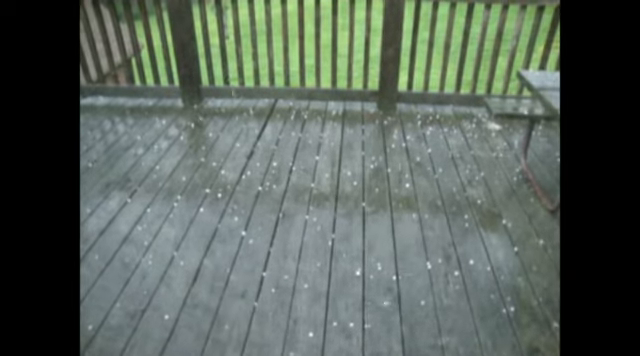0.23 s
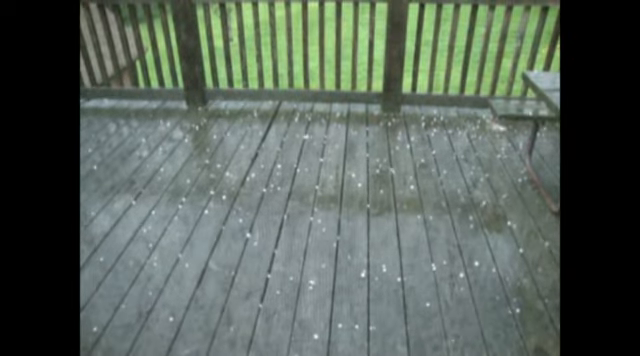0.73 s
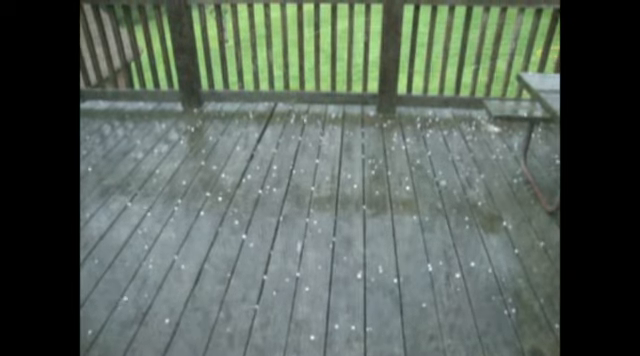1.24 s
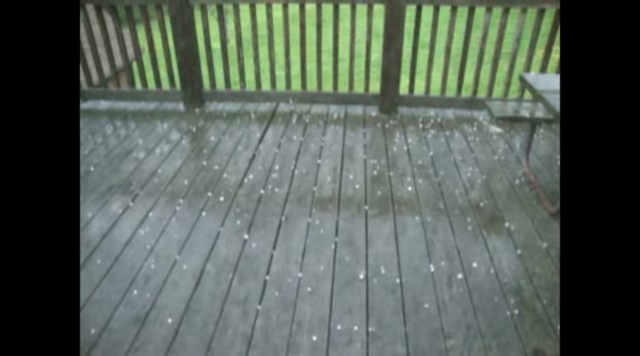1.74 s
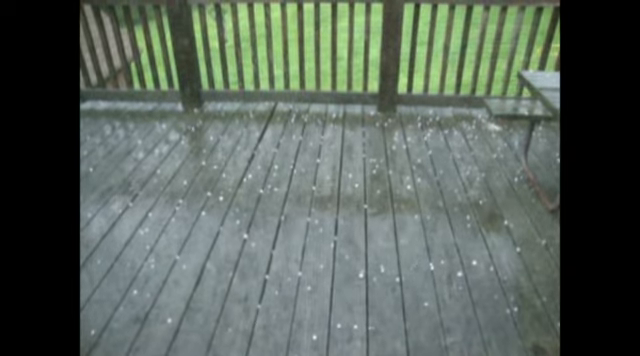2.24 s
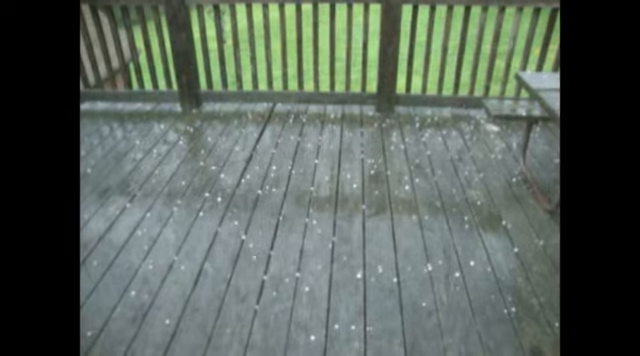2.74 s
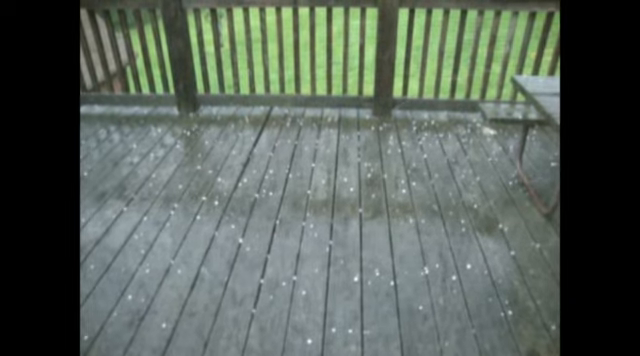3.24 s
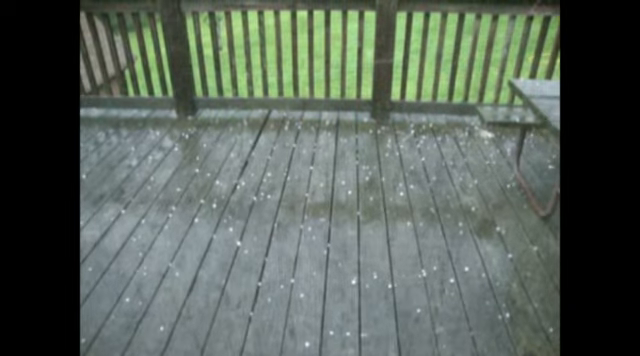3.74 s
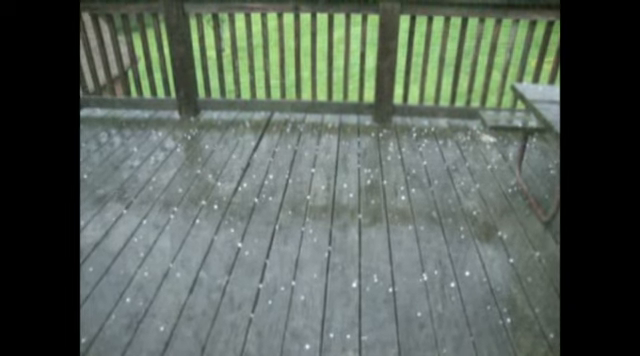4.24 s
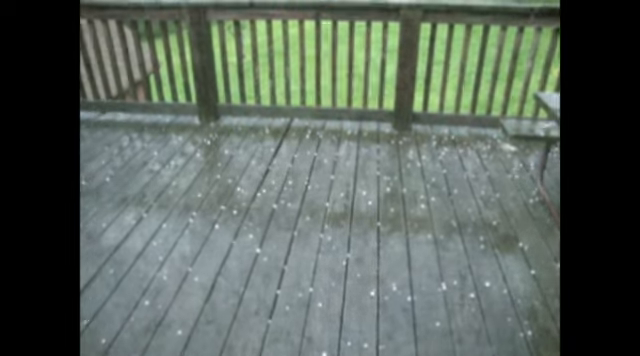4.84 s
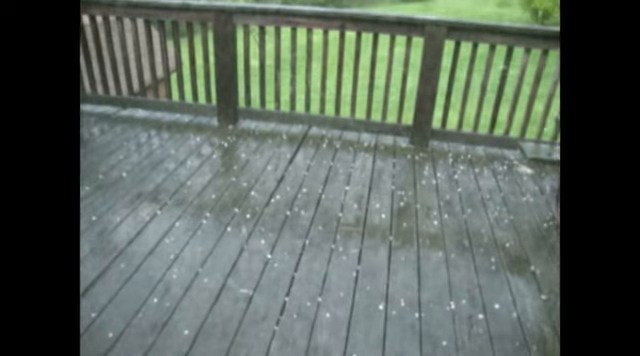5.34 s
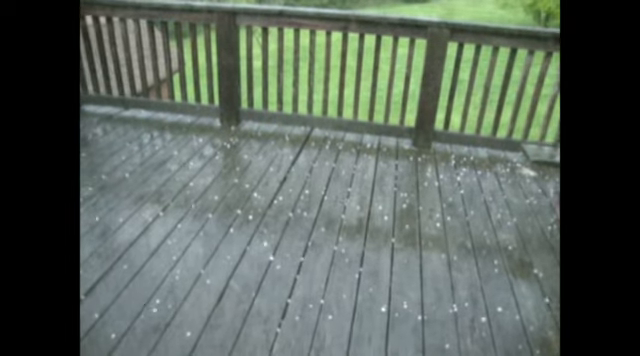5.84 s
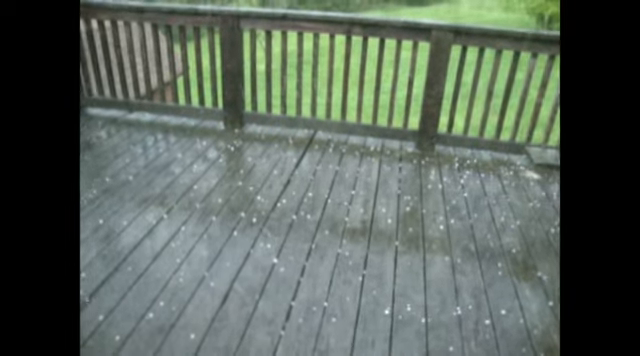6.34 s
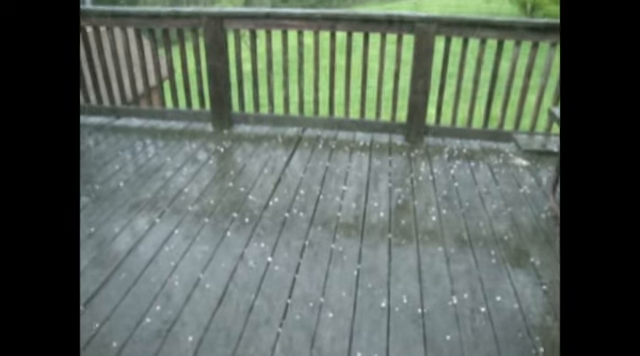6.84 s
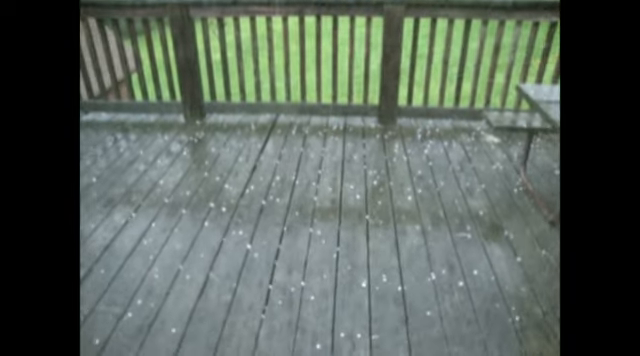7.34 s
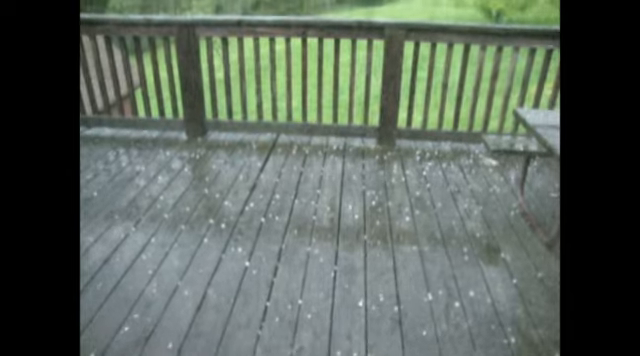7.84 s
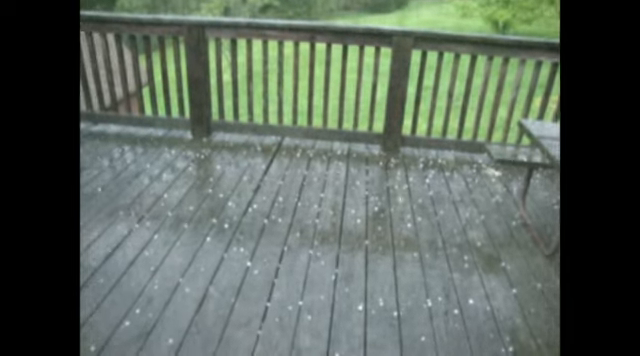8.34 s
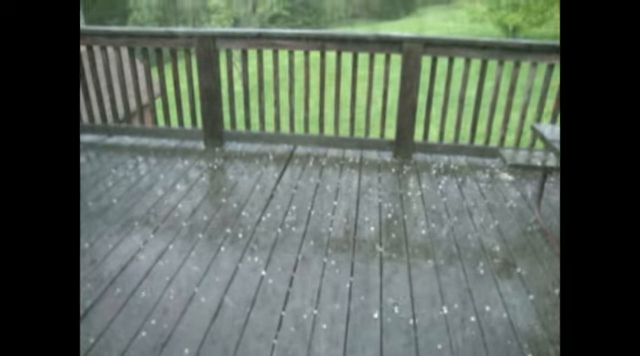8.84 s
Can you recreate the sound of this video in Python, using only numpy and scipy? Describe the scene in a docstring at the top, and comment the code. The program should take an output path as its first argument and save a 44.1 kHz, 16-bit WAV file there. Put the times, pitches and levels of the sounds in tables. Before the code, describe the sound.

Hail rattles onto outdoor deck boards: crisp irregular clicks, small clacks and occasional faint metallic pings above continuous light rain noise.

```python
"""A wooden deck beside a house wall, under a patter of small hail and rain.
Each near stone is an impact: a hard tick, then filtered noise decaying as boards, rails and wall reply.
Decaying sines ring struck spots and metal; low sines make thuds, and clustered modes make hard knocks.
Many random small ticks, clicks and plinks over a dull noise wash fill the gaps, following one shower level.
"""
import sys
import numpy as np
from scipy import signal
from scipy.fft import rfft, irfft
from scipy.io import wavfile

SR = 44100
rng = np.random.default_rng(int(sys.argv[2]) if len(sys.argv) > 2 else 0)


def master(y):
    """Save y as 16-bit WAV."""
    cut = np.clip(np.atleast_2d(y).T, -1, 1)
    pcm = np.round(cut * 32767)  # scale
    wavfile.write(sys.argv[1], SR, pcm.astype(np.int16))


N = 400869  # length of the scene in samples
HIT = 8192  # usual length of one impact in samples

# colour of ice on wet boards, as relative density: frequency_hz, level_db (per Hz)
DECK_COLOUR = [(24, -49), (40, -43), (124, -32), (583, -4), (1310, -1.5), (2330, 0), (4670, 2.5),
               (8710, -4), (10000, -9.5), (13000, -63), (22000, -120)]


def undb(db):
    """Level to amplitude: 20 dB is a factor of ten."""
    return 10 ** (np.asarray(db) / 20)


def unit(x):
    """Normalisation: scale the last axis to rms 1."""
    return x / np.sqrt(np.mean(x ** 2, axis=-1, keepdims=True) + 1e-20)


def fade(t60, size=HIT):
    """Exponential decay: the level falls 60 dB in t60 seconds."""
    return np.exp(-np.log(1000) * np.arange(size) / SR / t60)


def colour(points, size):
    """Spectral envelope: gain per bin, linear in dB over log frequency, from (Hz, dB) points."""
    hz, db = np.transpose(points)
    bin_hz = np.fft.rfftfreq(size, 1 / SR) + 1
    return undb(np.interp(np.log(bin_hz), np.log(hz), db))


def shape(x, gain):
    """Linear filtering: multiply the spectrum of the last axis by a gain per bin."""
    return irfft(rfft(x) * gain, x.shape[-1])


def causal(gain):
    """Minimum phase: fold the cepstrum so that a response of this gain rings only after the blow."""
    cepstrum = irfft(np.log(gain + 1e-5))
    half = cepstrum.shape[-1] // 2
    cepstrum[..., 1:half] *= 2
    cepstrum[..., half + 1:] = 0
    return np.exp(rfft(cepstrum))


def add(out, s, sound):
    """Superposition: mix a sound in at time s (seconds)."""
    i = int(np.clip(s * SR, 0, N - 1))
    out[i:i + len(sound)] += sound[:N - i]


def spots(count, spread_db, size=HIT, order=30):
    """Local resonance: every spot on the boards has its own broad, random peaks and dips."""
    hz = np.geomspace(200, 11000, order)
    chance = rng.standard_normal((count, order))
    return np.array([colour(np.c_[hz, spread_db * row], size) for row in chance])


def echoes(count, grain_db, size=HIT):
    """Dense reflections: Gaussian noise whose strength varies by chance from grain to grain."""
    chance = rng.standard_normal((count, 2, size))
    strength = np.repeat(chance[:, 1, ::16], 16, axis=1)  # one strength per 16 samples
    return unit(chance[:, 0] * undb(grain_db * strength))


def air(db=-72, low_hz=45, high_hz=330):
    """Stationary band-limited noise: a faint, even outdoor rumble under everything."""
    hz = np.fft.rfftfreq(N, 1 / SR)
    band = hz / (hz + low_hz) / (1 + (hz / high_hz) ** 4)
    return undb(db) * unit(shape(rng.standard_normal(N), band * np.sqrt(hz)))


def far_wash(flicker_db=4.0, count=400, rumble_hz=260):
    """Incoherent summation: hail on roof and lawn merges into dull noise, each octave flickering alone."""
    # colour of the shower further off, as relative density: frequency_hz, level_db (per Hz)
    far_colour = [(18, -62), (30, -55.5), (173, -7.5), (657, 7), (1120, 9), (4480, 3.5), (8640, -22),
                  (10000, -17), (13000, -33), (22000, -120)]
    # low end of the wash, strongest in the lowest octaves: time_s, level_db
    rumble_curve = [(0, -3), (1, -13), (2, -4), (3, -8), (4.001, -2), (4.401, 9), (5.5, 3), (6.4, 5.5),
                    (6.9, -4), (7.6, 3), (9, 6.5)]
    out = 0
    hz = np.fft.rfftfreq(N, 1 / SR) + 1
    rumble_db = np.interp(np.arange(N) / SR, *np.transpose(rumble_curve))
    for centre in 2. ** np.arange(5, 14):
        # overlapping bands whose powers add up evenly
        octave = np.sqrt(np.clip(1 - np.abs(np.log2(hz / centre)), 0, 1))
        flicker = np.interp(np.arange(N), np.linspace(0, N, count), rng.standard_normal(count))
        db = flicker_db * flicker + rumble_db / (1 + (centre / rumble_hz) ** 2)
        noise = shape(rng.standard_normal(N), octave * colour(far_colour, N))
        out = out + noise * undb(db)
    return unit(out)


def small_stones(count=1150, size=4096, spread_db=1.0, tick_t60=0.03, tail_t60=0.035, tail_db=-14):
    """Random impacts: lesser stones and drops over the deck, each a decaying noise tick with a short tail."""
    when, strength = rng.random((count, 2)).T
    envelope = fade(tick_t60, size) + undb(tail_db) * fade(tail_t60, size)
    gain = spots(count, spread_db=5.0, size=size, order=44) * colour(DECK_COLOUR, size)
    sounds = unit(shape(rng.standard_normal((count, size)) * envelope, causal(gain)))
    levels_db = -spread_db * np.log(0.73 + strength)
    out = np.zeros(N)
    for s, db, sound in zip(when * N / SR, levels_db, sounds):
        add(out, s, undb(db) * sound)
    return unit(out)


def drips(count=120, low_hz=2500, high_hz=8500, t60=0.017, glide=0.5, spread_db=7):
    """Damped oscillation: drops and bouncing ice give tiny plinks, sines that glide up very slightly."""
    out, t = np.zeros(N), np.arange(HIT) / SR
    for when, pitch, strength in rng.random((count, 3)):
        hz = low_hz * (high_hz / low_hz) ** pitch
        plink = np.sin(2 * np.pi * hz * t * (1 + glide * t)) * fade(t60)
        add(out, when * N / SR, undb(spread_db * strength) * plink)
    return unit(out)


def chips(count=190, size=1024, t60=0.0085, spread_db=5):
    """Brief broadband impacts: chips of ice bounce close by as dry clicks, most faint and a few sharp."""
    when, luck = rng.random((count, 2)).T
    gain = spots(count, spread_db=1.5, size=size) * colour(DECK_COLOUR, size)
    clicks = shape(rng.standard_normal((count, size)) * fade(t60, size), causal(gain))
    clicks /= np.abs(clicks).max(axis=1, keepdims=True)
    levels_db = -spread_db * np.log(0.062 + luck)
    out = np.zeros(N)
    for s, db, click in zip(when * N / SR, levels_db, clicks):
        add(out, s, undb(db) * click)
    return out


def rebounds(count, latest_s=.008, db=-8, order=3):
    """Early reflection: response of a tick and a few weaker ones, from shards and the nearest surfaces."""
    lag, strength = rng.random((count, 2, order, 1)).transpose(1, 0, 2, 3)
    hz = np.fft.rfftfreq(HIT, 1 / SR)
    delayed = np.exp(-2j * np.pi * hz * lag * latest_s)
    return 1 + np.sum(undb(db) * strength * delayed, axis=1)


def strikes(knock_top_hz=1500, splash_from_hz=5000,
            knock_t60=0.35, clatter_t60=0.27, splash_t60=0.13, tick_t60=0.017,
            tick_db=-5.0, knock_db=-2.5, clatter_db=-1.28, splash_db=-3.0,
            ring_lift_db=2, ring_octaves=0.11, tick_octaves=1.0,
            swell_s=0.003, grain_db=3, contact=4):
    """Impact and frequency-dependent damping: a direct tick, then boards and walls reply, treble dying first."""
    # hailstones that stand out, levels before the trims above:
    # start_s, tick_peak_db, wood_knock_db, clatter_db, icy_splash_db, spot_pitch_hz, spot_resonance_db
    stone_table = [(0.005, 0, -48, -20.5, -19, 6150, -2.5), (0.05, -10, -58, -28, -24, 6940, 3.0),
                   (0.104, -10, -27.5, -27, -47, 2060, 8), (0.151, -6, -31, -26, -19, 7100, 3),
                   (0.234, -28, -27, -18.5, -20.5, 3790.0, -4), (0.302, -10, -35, -19.5, -24, 5990.0, 5),
                   (0.314, -7, -29.5, -20.5, -30, 1930, -4), (0.358, -6, -27, -20.5, -25, 1960, 0),
                   (0.392, -13, -28, -20.5, -23, 1890, 3), (0.432, -6, -33, -22.5, -27, 3270.0, -1),
                   (0.477, -7, -29, -23, -33, 2840.0, 1), (0.603, -16.5, -28, -25, -18, 600.0, 1),
                   (0.6105, -10, -38, -20, -23, 3800, -1), (0.696, -22, -34, -36, -26, 1240, 4.5),
                   (0.704, -3.5, -35, -26, -32, 2800, -1), (0.782, -22, -30.5, -32, -35.0, 2800.0, 5),
                   (0.802, -6, -32, -27, -32, 3740, 1.5), (0.881, -5, -33, -25, -28, 4230, 5),
                   (0.916, -5.5, -38, -31, -28, 4180, 6), (1.015, -14, -31.5, -25, -33, 600.0, 3),
                   (1.044, -4, -40, -22, -39, 6550.0, 3.0), (1.063, -14, -55.0, -28, -23, 8400, 9),
                   (1.157, -6, -36, -29, -35, 4610.0, 3), (1.196, -3.5, -31.5, -22, -14, 5200, 2),
                   (1.234, -4, -33, -20.5, -14, 6100, -1), (1.266, -7.5, -29.5, -22, -18, 4900, 2),
                   (1.37, -11.5, -39, -30, -43, 5000, 4), (1.423, -10, -28.5, -25.5, -24, 2770, 4),
                   (1.473, -22, -37, -22, -28, 3140.0, 1), (1.496, -7, -45, -27, -31, 2600, 2.5),
                   (1.52, -5, -34.5, -24.5, -24, 5940.0, 3), (1.608, -10, -33, -23.5, -21.5, 5250.0, 1),
                   (1.751, -21, -33.5, -28.5, -26.5, 8180.0, 3), (1.864, -1, -29, -22, -19.5, 2300, 3),
                   (1.921, -17, -38, -33, -21, 7240.0, -3), (1.962, -12, -31, -31, -25, 2800.0, 7),
                   (1.994, -14, -35, -26, -24, 5170.0, 6.5), (2.013, -11, -36, -30, -32, 3000, 6),
                   (2.022, -5.5, -28, -24.5, -26, 1240, 1), (2.107, -14, -33, -28, -23.5, 3320.0, 8),
                   (2.186, -9.5, -29.5, -30.5, -23, 2630.0, 5), (2.22, -10, -29.5, -25, -29, 5530, 1),
                   (2.312, -21, -48, -28, -36, 5990.0, 2), (2.351, -7, -26.5, -26.5, -24, 3750.0, 4),
                   (2.463, -19, -25, -23, -23.5, 1380.0, 2), (2.513, -10, -31, -27, -18, 3140.0, 9),
                   (2.56, -7, -29, -23, -23, 2580.0, 0), (2.571, -6, -27, -22, -28, 2670.0, -5),
                   (2.585, -11.0, -35, -24, -31, 3750.0, -7), (2.591, -4.5, -34, -30, -20, 3420, 10),
                   (2.756, -10, -35.5, -30.5, -47, 5900.0, 4), (2.855, -9, -29, -23.5, -29, 1210.0, 2),
                   (2.881, -14, -29, -25, -18, 6100, 4), (2.986, -12, -43, -26, -26, 4780.0, -3),
                   (2.995, -10, -43, -30, -26, 3100, -2), (3.037, -1, -30, -23, -24, 3080, 1.5),
                   (3.077, -6, -29, -26, -23.5, 600.0, 2.5), (3.099, -7, -54.5, -33, -32, 2040, 6),
                   (3.15, -4.5, -58, -21, -16, 5900, -2.5), (3.246, -4.5, -38, -32, -43, 4010.0, 2),
                   (3.288, -10, -53.5, -26, -46, 3800, 6), (3.302, -13, -55, -28, -19, 5770.0, -2),
                   (3.348, -19, -48, -23, -18, 4300, 3), (3.416, -16, -30, -23, -34, 4220.0, 1),
                   (3.456, -8, -49, -32, -34, 4610.0, -4), (3.483, -7, -33, -33, -26, 2070.0, 2),
                   (3.491, -5, -48, -32, -27, 1970, 4.5), (3.571, -18, -38, -26, -41, 3750.0, -2),
                   (3.63, -11, -34, -25, -52, 5940.0, 4), (3.653, -12, -27, -30, -15, 7600, -2),
                   (3.717, -11.5, -34, -31, -22, 4440.0, 3), (3.764, -10, -35, -26.5, -25, 2150.0, -1),
                   (3.832, -5, -31.5, -26.5, -23, 5800, 3), (3.872, -11, -28.5, -21.5, -22, 5340.0, -4),
                   (3.899, -3, -42, -28, -32, 2330.0, 0.5), (3.941, -10, -31, -26.5, -19, 8100.0, 1),
                   (3.96, -17, -33, -23.5, -32, 3960.0, 2), (3.991, -6, -29, -26.5, -20, 8600, 4),
                   (4.03, -12, -47, -33, -30, 7670.0, 0), (4.059, -12, -28.5, -28, -18, 6720.0, -4),
                   (4.072, -11, -50, -27, -41, 1420, 10), (4.12, -13, -34, -33.5, -34.5, 3790.0, 3),
                   (4.166, -7, -50, -20, -33, 5950, 4), (4.228, -20, -31, -26.0, -33, 3060.0, 1),
                   (4.285, -9, -51, -24.5, -23, 4760, 5.5), (4.307, -13, -36, -29.5, -36, 2180, 6),
                   (4.411, -2.5, -45, -29, -21.5, 8050, 0.5), (4.457, -23.5, -48, -37, -24, 3250, 8),
                   (4.517, -9, -29, -22.5, -28, 4900, 3.5), (4.636, -18.0, -52, -39, -25.5, 7620.0, -1),
                   (4.654, -8, -34, -28, -41, 735, 3.5), (4.668, -7.5, -50, -26, -48, 4440.0, 1),
                   (4.699, -8, -41, -22.5, -24, 3500, 6), (4.78, -26.0, -28, -30, -25, 2370.0, 6),
                   (4.845, -2, -31.5, -27, -48, 2800, 5.5), (4.878, -26, -35, -26, -16.5, 6330.0, -4),
                   (4.892, -10, -26.5, -36, -32, 950.0, -1.5), (4.911, -9, -34, -24, -21, 3830.0, 3),
                   (5.0705, -5.5, -39, -27, -22.5, 2450, 5), (5.125, -12.5, -37, -27, -26.5, 786, 9),
                   (5.172, -22, -39, -26, -26, 1030.0, 2), (5.186, -5.5, -31.5, -34, -18.5, 7540.0, 0),
                   (5.247, -9.5, -33, -30, -33.0, 5940.0, 0), (5.307, -11, -40, -32, -46, 1340.0, 2.5),
                   (5.337, -12, -36, -21.5, -21, 2690, 4), (5.354, -8.5, -25.5, -45, -25, 960, -1),
                   (5.42, -6.5, -35, -26.0, -22.5, 5210.0, 0), (5.492, -18.5, -40, -22.5, -26, 1090, 13.5),
                   (5.55, -3, -27.5, -26, -27.5, 2600, 2), (5.564, -10, -37, -27, -31, 1130, 9),
                   (5.608, -10, -34, -33, -36, 2580.0, -3), (5.693, -4, -30, -17, -21, 4770, 0.5),
                   (5.764, -14.0, -40, -30, -24.5, 8050, 3.5), (5.891, -21, -34.5, -28.5, -27, 7700, -1),
                   (5.932, -13, -56, -50, -25, 5900.0, 2), (6.051, -13, -30.5, -38, -28, 2800.0, 8),
                   (6.079, -14, -37, -30, -36, 4840, 2), (6.164, -17, -24.5, -26, -36, 1840, 7),
                   (6.18, -12, -37, -22, -37, 2410.0, 6), (6.235, 2, -37, -18.5, -23, 4900, 2),
                   (6.26, -10, -30, -21, -16, 5730.0, 3), (6.307, -11, -28, -26, -32, 1770.0, -6),
                   (6.336, -5, -43, -31, -48, 1550.0, 2), (6.371, -12, -37, -21, -48, 4000, 5),
                   (6.386, -2.5, -43, -39, -35, 4050.0, 0), (6.41, -6.5, -31, -22, -26, 3620.0, -1),
                   (6.432, -11, -23.5, -21.5, -19, 5680.0, 2), (6.497, -2, -34.5, -33, -24, 7800.0, 0.5),
                   (6.526, -4.5, -56, -28, -24, 4730, 3), (6.544, -3, -42, -32, -23.5, 8100, 1),
                   (6.603, -30, -41, -26, -18, 5940, 7), (6.622, -8, -29, -21.5, -34, 2490, -4),
                   (6.698, -11, -30, -26.5, -20, 1040, 3), (6.813, -29, -55.0, -28, -21, 7920.0, -4),
                   (6.928, -4, -30, -21.5, -30, 4300, 0), (6.959, -6, -35.5, -22.5, -22, 4700, -1),
                   (7.078, -25, -27.5, -24, -27, 1080, 9), (7.139, -7, -30.5, -29, -24, 6680.0, 1),
                   (7.171, -3.5, -49, -26, -25, 4780.0, 1.5), (7.204, -12, -36, -31, -29, 1210.0, 7),
                   (7.237, -6, -33, -23, -22, 4200, 3), (7.28, -10, -36, -35, -22, 7450.0, 0),
                   (7.301, -7, -25, -27, -26.0, 7410.0, 3), (7.391, -13, -36, -26, -25, 3700, 7),
                   (7.445, -8.5, -30, -41, -37, 4050.0, 7.5), (7.55, -9, -32, -24, -40, 5040.0, -2.5),
                   (7.605, -13, -28, -27.5, -23, 6760.0, 1), (7.65, -18, -41, -29, -30, 3190.0, -2),
                   (7.682, -17, -41, -39, -28, 4010.0, 1.5), (7.704, -12, -44, -33, -31, 4010.0, 5),
                   (7.721, -10, -32, -31, -28, 3750.0, 5), (7.752, -13.0, -30, -19, -46, 1870, 3),
                   (7.804, -2.5, -40, -29, -36, 3490.0, 1), (7.823, -6.5, -46, -29, -22, 5680.0, -4),
                   (7.95, -13, -34, -31, -32, 1290.0, 7), (7.98, -10, -45, -25, -40, 900.0, 9),
                   (8.031, -16.0, -35, -28, -28, 2020.0, 4.5), (8.056, -15, -27, -27, -25, 1010, 4),
                   (8.13, -9, -25.5, -26, -44, 1480, 0), (8.185, -21, -34, -25, -22.5, 8200, 3),
                   (8.298, -22, -27.5, -22.5, -26, 690.0, -11), (8.308, -7.5, -35, -28, -30, 4260, 5),
                   (8.377, -4, -36.0, -27, -24, 4540, 0.5), (8.443, -1.5, -33, -33, -28, 4390.0, 4),
                   (8.488, -6, -30, -25.5, -32, 4090.0, -2), (8.63, -9, -28.5, -25.0, -32, 2100, 3),
                   (8.78, -16, -46, -23.5, -27, 4180.0, -6), (8.806, -12, -37, -33.5, -22.5, 2420, 9),
                   (8.968, -22, -32, -24, -40, 2300, 9), (9.026, -6, -39, -22, -26, 3550, 2),
                   (9.036, -10, -29.5, -27, -38, 1610, 8)]
    s, peak_db, *band_db, ring_hz, ring_db = np.transpose(stone_table)[:, :, None]
    hz, t = np.fft.rfftfreq(HIT, 1 / SR) + 1, np.arange(HIT) / SR
    below = 1 / (1 + (hz / knock_top_hz) ** 8)
    above = 1 - 1 / (1 + (hz / splash_from_hz) ** 8)
    band_power = [below, (1 - below) * (1 - above), above]
    bands = unit(np.sqrt(band_power) * colour(DECK_COLOUR, HIT))
    # each spot has one leading resonance among weaker chance ones, lifted as the board rings on
    octaves = np.log2(hz / ring_hz)
    resonance_db = (ring_db + ring_lift_db) * np.exp(-(octaves / ring_octaves) ** 2)
    spot = spots(len(s), spread_db=2.0) * undb(resonance_db)
    # grainy reflections build up with time constant swell_s
    reflections = echoes(len(s), grain_db) * (1 - np.exp(-t / swell_s))
    # keeps the seams between the bands level
    overlap = np.sqrt(1 + 2 * np.sqrt(below * (1 - below)) + 2 * np.sqrt(above * (1 - above)))
    trims = undb([knock_db, clatter_db, splash_db])
    body, power = 0, 0
    for band, db, trim, t60 in zip(bands, band_db, trims, (knock_t60, clatter_t60, splash_t60)):
        gain = unit(band * spot) * trim * undb(db)
        body = body + gain * rfft(reflections * fade(t60)) / overlap
        power = power + gain ** 2
    body = irfft(body * np.exp(1j * np.angle(causal(np.sqrt(power)))))
    # the contact adds one spike, contact times the initial rms of the crunch; its pitch is a broad hump
    hump = undb(2 * ring_db * np.exp(-(octaves / tick_octaves) ** 2))
    crunch = rng.standard_normal((len(s), HIT)) * fade(tick_t60) + contact * (t == 0)
    tick = shape(crunch, causal(np.sqrt(power) * hump) * rebounds(len(s)))
    tick *= undb(peak_db + tick_db) / np.abs(tick).max(axis=1, keepdims=True)
    out = np.zeros(N)
    for when, sound in zip(s[:, 0], body + tick):
        add(out, when, sound)
    return out


def ringing_spots(order=5, spread_hz=45, spread_share=0.024, attack_s=0.0021):
    """Modal beating: a struck spot rings in close modes, a hollow tock when low, a ping when high."""
    # short rings of a board, rail or piece of ice: start_s, pitch_hz, level_db, t60_s
    ring_table = [(0.071, 5600, -23, 0.096), (0.314, 1864, -30, 0.11), (0.359, 1644, -26, 0.121),
                  (0.356, 2560, -18, 0.065), (0.712, 2730, -17, 0.037), (1.0, 4530, -38, 0.15),
                  (1.016, 710, -27, 0.067), (1.162, 4520, -26, 0.11), (1.233, 6160, -24, 0.16),
                  (1.237, 4640, -22.5, 0.15), (1.237, 1490, -31, 0.37), (1.243, 3380, -22.5, 0.16),
                  (1.25, 3704, -28, 0.09), (1.727, 3250, -26, 0.035), (2.022, 1400, -30, 0.092),
                  (2.268, 7500, -25, 0.048), (2.559, 2650, -26, 0.14), (2.585, 3790, -23, 0.105),
                  (2.587, 1860, -22, 0.09), (3.04, 2240, -28, 0.126), (3.097, 1800, -26, 0.18),
                  (3.765, 2130, -26.5, 0.057), (3.771, 3140, -27, 0.2), (3.834, 4479, -23, 0.091),
                  (3.877, 5420, -25, 0.12), (4.074, 1240, -26, 0.069), (4.094, 1870, -22.5, 0.044),
                  (4.122, 3830, -23, 0.065), (4.239, 4220, -20, 0.08), (4.518, 5600, -22, 0.083),
                  (4.706, 3680, -22, 0.061), (4.899, 1710, -28, 0.15), (5.421, 5082, -22, 0.053),
                  (5.562, 1200, -32, 0.084), (5.567, 1723, -30.0, 0.15), (5.606, 2580, -30, 0.051),
                  (5.692, 4710, -28, 0.129), (6.183, 1750, -23, 0.08), (6.234, 4870, -28, 0.15),
                  (6.243, 3900, -20, 0.11), (6.294, 1734, -26, 0.15), (6.433, 5780, -30, 0.124),
                  (6.477, 1123, -26.5, 0.18), (7.146, 6800, -27, 0.12), (7.651, 3180, -27, 0.07),
                  (7.761, 1680, -27.1, 0.17), (7.98, 940, -24.5, 0.076), (8.056, 1164, -27, 0.1),
                  (8.93, 2730, -37, 0.24), (8.928, 6140, -26, 0.063), (8.968, 1900, -30, 0.17),
                  (9.036, 1440, -23, 0.18)]
    out, t = np.zeros(N), np.arange(HIT) / SR
    chances = rng.standard_normal((len(ring_table), 2, order, 1))
    for (s, hz, db, t60), (detune, phase) in zip(ring_table, chances):
        mode_hz = hz + detune * (spread_hz + spread_share * hz)
        modes = np.sin(2 * np.pi * (mode_hz * t + phase)).sum(axis=0)
        envelope = fade(t60) * (1 - np.exp(-t / attack_s))
        # rms is set by the envelope, whatever the phases of the modes
        add(out, s, undb(db) * unit(modes * envelope) * np.sqrt(np.mean(envelope ** 2)))
    return out


def metal(count=40, stray_db=-56, stray_spread_db=6):
    """Lightly damped modes: three struck pieces of metal ring on; stray small stones keep two faintly astir."""
    # stones on metal: start_s, piece (number), level_db
    ping_table = [(0.221, 1, -42), (0.801, 1, -37), (1.729, 0, -43), (2.019, 0, -40.5), (2.7, 1, -45),
                  (3.041, 1, -44), (3.36, 1, -39), (4.74, 1, -36), (5.34, 0, -38), (5.34, 2, -35.5),
                  (5.47, 2, -33), (5.52, 0, -42), (7.631, 1, -34.5), (7.89, 1, -35), (8.441, 0, -38),
                  (8.931, 0, -38)]
    # modes of the metal, levels relative to the blow: piece (number), pitch_hz, level_db, t60_s
    mode_table = [(0, 994, 0.5, 1.7), (2, 2555, 1.5, 0.95), (1, 1299, 1, 1.4)]
    out, t = np.zeros(N), np.arange(SR) / SR  # each ring is cut off after 1 s
    when, which, strength = rng.random((count, 3)).T
    strays = zip(when * N / SR, which, stray_db + stray_spread_db * strength)
    rings = []
    for piece, hz, db, t60 in mode_table:
        rings.append((piece, undb(db) * np.sin(2 * np.pi * hz * t) * fade(t60, size=SR)))
    for s, struck, db in [*ping_table, *strays]:
        for piece, ring in rings:
            if round(piece) == round(struck):  # strays round to piece 0 or 1
                add(out, s, undb(db) * ring)
    return out


def thuds(attack_share=0.052):
    """Damped low mode: a heavy stone gives a board one low push; a loose board rings for a few cycles."""
    # low thuds and hollow knocks, level before onset and high-pass: start_s, pitch_hz, t60_s, level_db
    thud_table = [(0.313, 170, 0.0067, -26), (.61, 170, .008, -31), (1.265, 150, 0.009, -36),
                  (1.591, 200, 0.0085, -28), (2.381, 248, 0.058, -30), (3.076, 328, 0.084, -34),
                  (3.151, 180, 0.0064, -37), (3.303, 170, 0.007, -38), (3.507, 160, 0.0069, -37),
                  (3.656, 150, .008, -43), (5.052, 150, 0.0074, -44), (5.693, 170, 0.0049, -25),
                  (6.527, 150, .008, -38)]
    out, t = np.zeros(N), np.arange(HIT) / SR
    for s, hz, t60, db in thud_table:
        onset = 1 - np.exp(-t / (attack_share * t60))
        add(out, s, undb(db) * np.sin(2 * np.pi * hz * t) * fade(t60) * onset)
    return signal.sosfilt(signal.butter(1, 45, "high", fs=SR, output="sos"), out)


def clacks(order=13, attack_s=0.000081, spread_octaves=0.284, crack_db=-5, crack_t60=0.0079):
    """Modal superposition: a noise crack and a cluster of short-lived modes, strongest around the pitch."""
    # hard, compact knocks on a board or rail: start_s, pitch_hz, peak_db, t60_s
    clack_table = [(0.3147, 2000, -5, .007), (0.3579, 1990, -9.5, 0.028), (0.4329, 3480, -7, .002),
                   (0.4815, 2840, -15, 0.014), (0.5325, 4300, -10, 0.0065), (0.6135, 3560, -6.5, 0.0017),
                   (0.696, 1280, -16.5, 0.04), (1.0, 4500, -18, .02), (1.587, 1300, -17, 0.022),
                   (1.588, 4260, -15.5, 0.027), (1.5913, 5070, -6, 0.0016), (1.726, 3330, -18, .025),
                   (1.7298, 3100, -15.5, .012), (2.024, 1334, -11, 0.026), (2.986, 4560, -15, 0.013),
                   (3.3022, 5000, -6.5, .002), (3.416, 4300, -16, .013), (4.3072, 2320, -15.5, 0.028),
                   (4.4255, 3700, -15, 0.0064), (4.8456, 2880, -6.5, 0.018), (5.0192, 4850, -13.5, 0.01),
                   (5.0505, 4900, -6, .008), (5.0723, 6300, -15, 0.0098), (5.692, 3500, -6, 0.0027),
                   (5.891, 7700, -16, 0.011), (6.0825, 4820, -11.5, .012), (6.562, 6100, -6, 0.0046),
                   (6.813, 4650, -30, .014), (6.9585, 4600, -10, .012), (7.885, 4660, -12.5, .01),
                   (8.0647, 1290, -21, 0.019), (8.82, 4960, -18, .003), (8.9682, 2350, -12.5, .028),
                   (9.0365, 1600, -12, .035)]
    out, t = np.zeros(N), np.arange(HIT) / SR
    ice = causal(colour(DECK_COLOUR, HIT))
    steps = np.linspace(-2, 2, order)[:, None]
    cracks = rng.standard_normal((len(clack_table), HIT))
    chances = rng.random((len(clack_table), 2, order, 1))
    for (s, hz, db, t60), crack, (detune, phase) in zip(clack_table, cracks, chances):
        mode_hz = hz * 2 ** (spread_octaves * (steps + (detune - .5) / 2))
        modes = np.exp(-steps ** 2 / 2) * np.sin(2 * np.pi * (mode_hz * t + phase))
        ring = modes.sum(axis=0) * fade(t60) * (1 - np.exp(-t / attack_s))
        crack = crack * fade(min(t60, crack_t60))
        blow = ring / np.abs(ring).max() + undb(crack_db) * crack / np.abs(crack).max()
        clack = shape(blow, ice)
        add(out, s, undb(db) * clack / np.abs(clack).max())
    return out


def scene(small_db=-2.5, wash_db=-4.0, drips_db=-18, chips_db=4.0):
    """Superposition of near stones and rings over a bed whose patter, wash, drips and chips share one level."""
    # strength of the shower of small stones and drops, before the trims above: time_s, level_db
    shower_curve = [(0.0, -24.5), (0.35, -33.5), (0.7, -34), (1.05, -31), (1.4, -34), (1.75, -35.5),
                    (2.1, -36), (2.45, -29), (2.8, -33), (3.15, -31), (3.5, -31.5), (3.85, -42.5),
                    (4.2, -33.5), (4.54, -34), (4.89, -30.5), (5.24, -34.5), (5.59, -27), (5.94, -35),
                    (6.29, -32.5), (6.64, -33), (6.99, -35), (7.34, -30), (7.69, -30), (8.04, -30.5),
                    (8.39, -31), (8.74, -29.5), (9.09, -32)]
    shower = undb(np.interp(np.arange(N) / SR, *np.transpose(shower_curve)))
    patter = undb(small_db) * small_stones() + undb(wash_db) * far_wash()
    bits = undb(drips_db) * drips() + undb(chips_db) * chips()
    bed = shower * (patter + bits)
    return (strikes() + clacks() + ringing_spots() + bed + thuds() + metal() + air())[None]


def record(dry, top_hz=10100):
    """Band limitation: a steep elliptic low-pass removes the extreme treble."""
    return signal.sosfilt(signal.ellip(12, .2, 75, top_hz, fs=SR, output="sos"), dry)


dry = scene()
out = record(dry)
master(out)
```